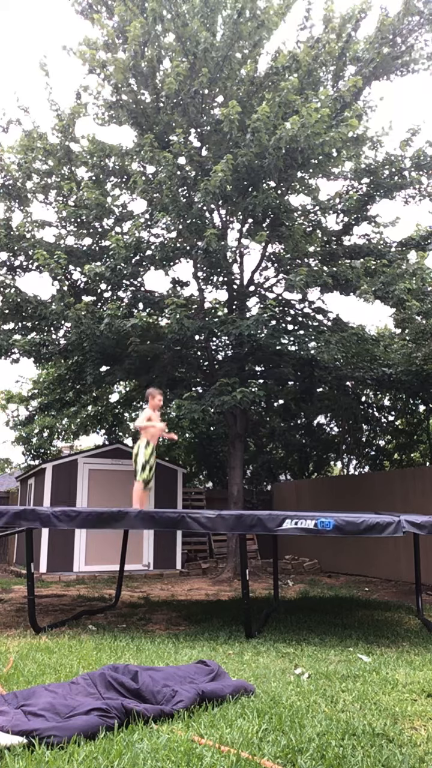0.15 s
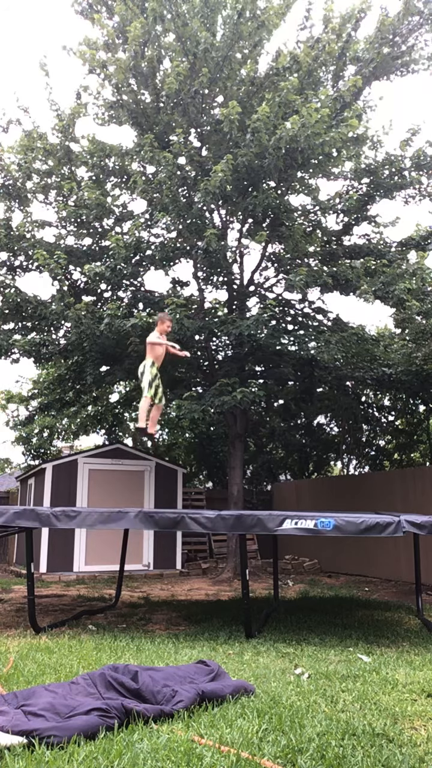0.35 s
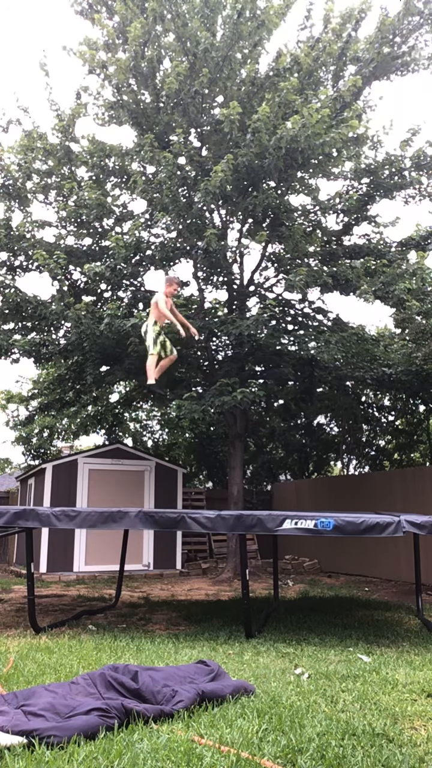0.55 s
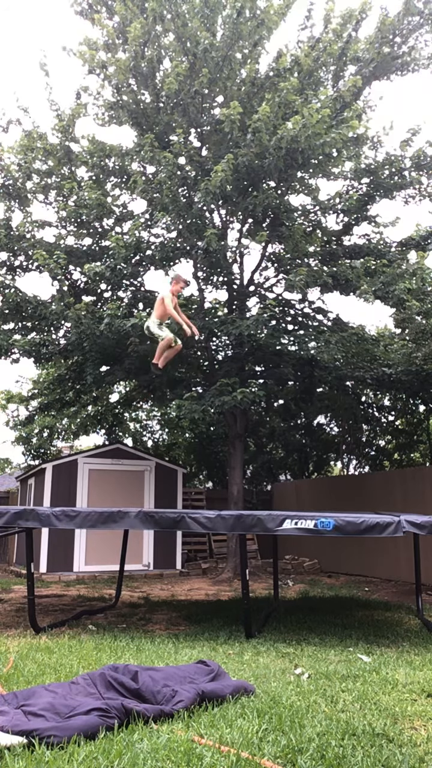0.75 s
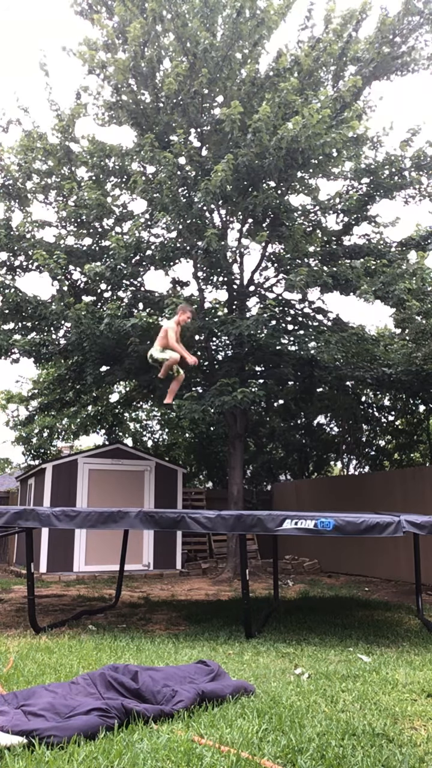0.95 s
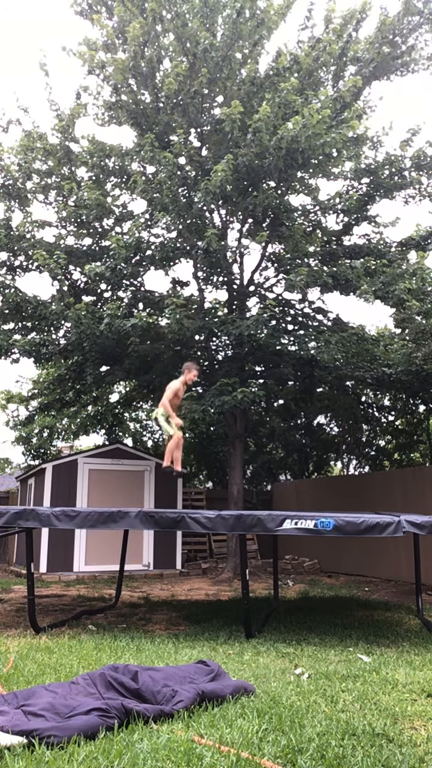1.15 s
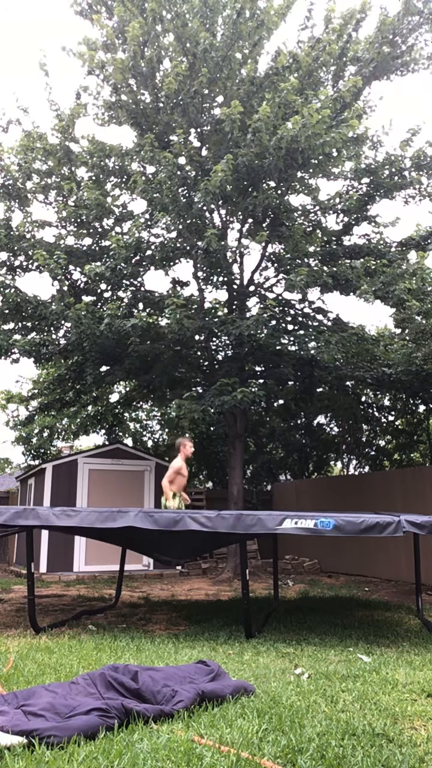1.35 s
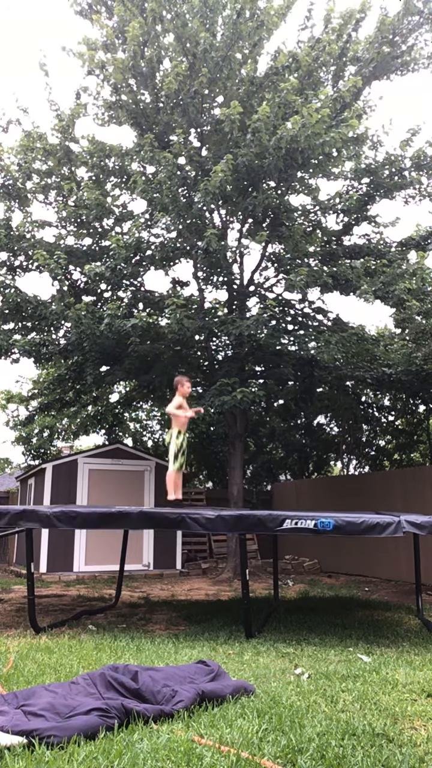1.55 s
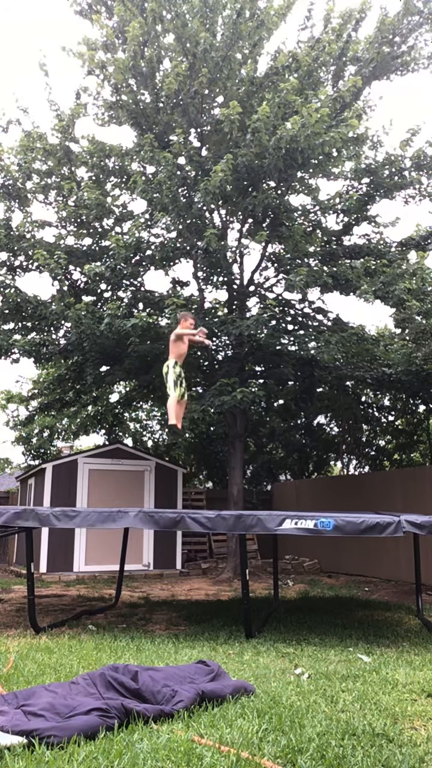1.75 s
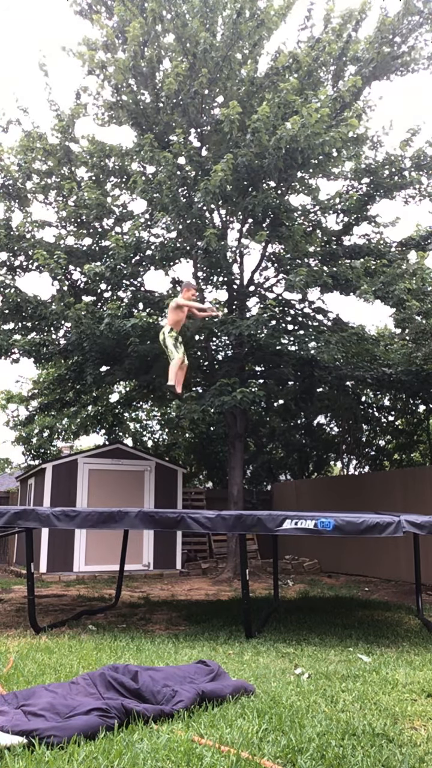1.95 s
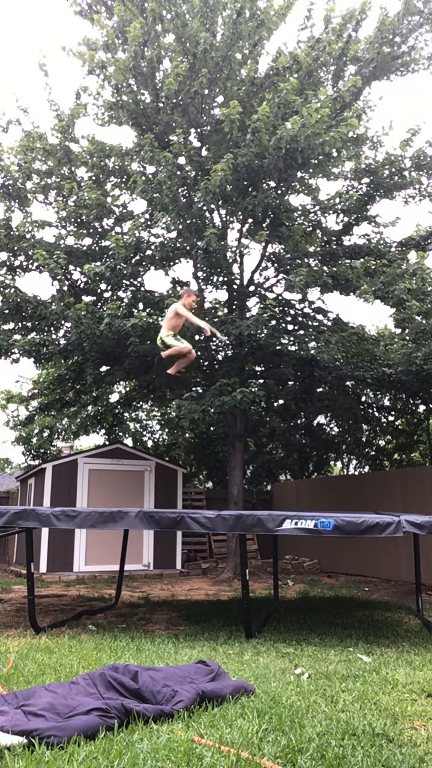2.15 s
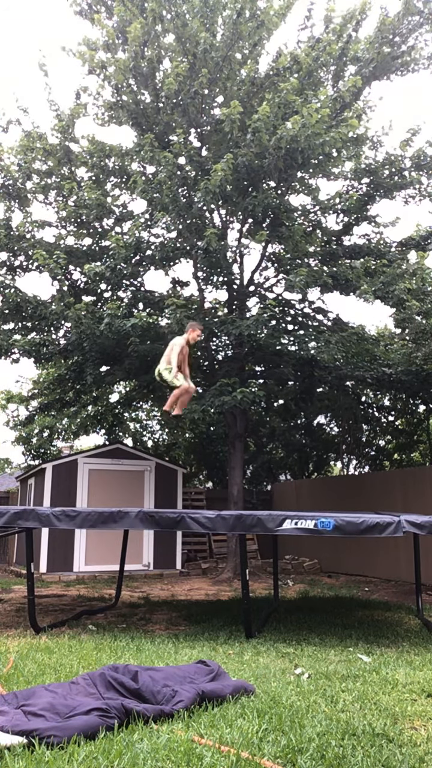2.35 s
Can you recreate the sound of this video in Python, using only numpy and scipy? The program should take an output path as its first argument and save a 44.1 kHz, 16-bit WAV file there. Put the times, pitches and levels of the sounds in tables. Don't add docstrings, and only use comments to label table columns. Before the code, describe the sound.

Hollow trampoline bounces thump and rattle the steel frame, with soft flapping and faint insects behind

```python
import sys
import numpy as np
from scipy import signal
from scipy.io import wavfile

SR = 44100
rng = np.random.default_rng(int(sys.argv[2]) if len(sys.argv) > 2 else 0)


def linear_from_db(decibels):
    return 10 ** (np.asarray(decibels, float) / 20)


def bounce(signal):
    frames = np.transpose(np.atleast_2d(signal))
    limited = np.clip(frames, -1, 1)
    pcm = np.round(limited * 32767).astype(np.int16)
    wavfile.write(sys.argv[1], SR, pcm)


N = 110250


def rms_one(x):
    return x / np.sqrt(np.mean(x ** 2) + 1e-20)


def white():
    return rng.standard_normal((2, N + SR // 10))


def drift(rate):
    hold = 40
    r = np.exp(-2 * np.pi * rate * hold / SR)
    noise = rng.standard_normal(N // hold + 2002)
    slow = signal.lfilter([1], [1, -2 * r, r * r], noise)[2000:]
    return np.interp(np.arange(N) / hold, np.arange(len(slow)), rms_one(slow))


def ring(x, hz, t60):
    r, w = linear_from_db(-60 / (t60 * SR)), 2 * np.pi * hz / SR
    return signal.lfilter([0, np.sin(w)], [1, -2 * r * np.cos(w), r * r], x + 1e-18)


def whistle(hz):
    return np.sqrt(2) * np.sin(2 * np.pi * np.cumsum(hz) / SR)


def swell(s, rise, fall):
    t = np.arange(N) / SR - s
    return np.exp(np.where(t < 0, t / max(rise, 1e-3), -t / max(fall, 1e-3)))


def bands(source, spectrum, patchy_db, rate):
    hz, db = np.transpose(spectrum)
    edges = 28 * 2 ** np.arange(0, 9.4, 1 / 3)
    edges = edges[(edges > hz[0] / 1.3) & (edges < hz[-1] * 1.3)]
    mids = np.sqrt(edges[1:] * edges[:-1])
    together = drift(rate / 4)
    rows = []
    for k, (low, high, mid) in enumerate(zip(edges, edges[1:], mids)):
        sos = signal.butter(2, [low, high], "band", fs=SR, output="sos")
        band = signal.sosfilt(sos, source[k % 2])[-N:]
        flicker_db = patchy_db * (0.5 * together + drift(rate))
        rows.append(linear_from_db(np.interp(np.log(mid), np.log(hz), db) + flicker_db) * band)
    rows = np.array(rows)
    return rows / np.sqrt(np.mean(rows.sum(axis=0) ** 2)), mids


def gusts(rows, octave, table):
    out = np.zeros(N)
    for s, db, rise, fall, tilt_db in table:
        out += linear_from_db(db) * swell(s, rise, fall) * (linear_from_db(tilt_db * octave) @ rows)
    return out


# f/Hz, density/dB per Hz
TRAFFIC_COLOUR = [(18, -49), (30, -10), (145, -4), (178, 3.5), (243, -10), (350, -5.5), (444, -18.5),
                  (1200, -10), (2400, -29), (3120, -76), (5280, -120)]
# f/Hz, density/dB per Hz
LEAF_COLOUR = [(1180, -32), (2000, -3.5), (2220, -6.5), (4710, -20.5), (7230, -25.5), (9510, -24),
               (11300, -26), (15500, -30)]
# f/Hz, width/Hz, rms level/dB
DRONE_HUMS = [(120, 8.6, -59), (172.7, 14, -67.5), (350.2, 13, -71), (776, 300, -60.5), (1189.6, 89, -67),
              (1374, 112, -65)]
TRAFFIC_DB, LEAVES_DB = -51, -67.5


def garden():
    traffic = bands(white(), TRAFFIC_COLOUR, patchy_db=0.6, rate=5.0)[0].sum(axis=0)
    leaves = bands(white(), LEAF_COLOUR, patchy_db=0.4, rate=12.0)[0].sum(axis=0)
    out = linear_from_db(TRAFFIC_DB) * traffic + linear_from_db(LEAVES_DB) * leaves
    for hz, width_hz, db in DRONE_HUMS:
        t60 = 2.3 / width_hz
        noise = rng.standard_normal(N + SR)
        hum = ring(ring(noise, hz, t60), hz, t60)[-N:]
        out += linear_from_db(db) * rms_one(hum)
    return out


# t/s, length/s, first f/Hz, last f/Hz, rms level/dB
CRICKET_NOTES = [(0.126, .012, 5620, 5460, -65), (.139, 0.016, 5640, 5900, -57),
                 (0.165, 0.036, 5660, 5610, -57.5), (0.2, .022, 5620, 5610, -57),
                 (0.244, .015, 5660, 5620, -71), (0.313, .008, 5620, 5660, -66),
                 (0.35, .012, 5620, 5560, -65), (.36, .015, 5640, 5640, -63),
                 (.965, 0.026, 5800, 5700, -85), (.998, 0.057, 5640, 5620, -78.5),
                 (1.057, 0.04, 5625, 5610, -83), (1.11, .035, 5600, 5600, -76),
                 (1.142, 0.064, 5600, 5610, -73), (1.212, 0.018, 5650, 5660, -71),
                 (1.24, .07, 5630, 5700, -78), (1.336, 0.02, 5700, 5715, -73.5),
                 (1.37, .035, 5720, 5710, -80), (1.405, .03, 5720, 5720, -81),
                 (1.436, 0.023, 5800, 5690, -85), (1.482, .012, 5600, 5600, -80),
                 (1.523, 0.022, 5760, 5800, -75)]


def cricket():
    t = np.arange(N) / SR
    waver_hz, throb = 10.0 * drift(33.0), linear_from_db(3.0 * drift(45.0))
    out = np.zeros(N)
    for s, length, first_hz, last_hz, db in CRICKET_NOTES:
        gate = np.clip(np.minimum(t - s, s + length - t) / 0.008 + 0.4, 0, 1)
        glide_hz = np.interp(t, [s, s + length], [first_hz, last_hz])
        out += linear_from_db(db) * gate * whistle(glide_hz + waver_hz)
    return throb * out


# t/s, length/s
KATYDID_CHIRPS = [
    [(.03, 0.018), (.695, 0.015), (.732, 0.0058), (.765, 0.0083), (.797, 0.0079), (.893, 0.0092),
     (1.066, 0.019), (1.097, 0.0089), (1.13, 0.0097), (1.167, 0.01), (1.197, 0.01), (1.238, 0.0083),
     (1.266, 0.013), (1.443, 0.011), (1.465, .01), (2.242, .008), (2.262, 0.01), (2.299, 0.01),
     (2.332, 0.0065), (2.404, 0.015), (2.432, 0.0082), (2.467, .009)],
    [(.998, 0.029), (1.368, 0.068), (2.163, 0.024)],
    [(.632, 0.0091), (.662, .022), (1.03, 0.016), (2.193, .05)],
    [(1.045, 0.032), (1.07, 0.04), (1.39, .035)],
    [(.108, .026)],
    [(.294, 0.021), (.336, .012)],
]
# f/Hz, rms level/dB
KATYDID_VOICES = [(9400, -78), (10250, -82), (12900, -84), (6850, -86), (13600, -80), (10800, -73)]
TICKS_PER_S, FIRST_TICK_S = 91.9, 0.0089
TICK_DB, TICK_SCATTER_DB = -85, 2.0


def katydids():
    t, out = np.arange(N) / SR, np.zeros(N)
    for chirps, (hz, db) in zip(KATYDID_CHIRPS, KATYDID_VOICES):
        gate = sum(np.clip(np.minimum(t - s, s + length - t) / 0.0029, 0, 1) for s, length in chirps)
        out += linear_from_db(db + 3.0 * drift(120.0)) * gate * whistle(hz + 110 * drift(150.0))
    at = (np.arange(FIRST_TICK_S, N / SR, 1 / TICKS_PER_S) * SR).astype(int)
    ticks = np.zeros(N)
    ticks[at] = linear_from_db(TICK_SCATTER_DB * rng.standard_normal(len(at)))
    ticks = signal.lfilter([1], [1, -0.93], ticks) * rng.choice([-1, 1], N)
    treble = signal.butter(2, [8500, 16000], "band", fs=SR, output="sos")
    return out + linear_from_db(TICK_DB) * rms_one(signal.sosfilt(treble, ticks))


# t/s, rms level/dB, rise/s, fall/s, brightness/dB per octave
AIR_RUSHES = [(.06, -69, 0.066, 0.021, -5.5), (0.108, -61, 0.001, 0.08, -0.5),
              (0.162, -53, 0.029, 0.089, -2.5), (.26, -62.5, 0.033, 0.1, -3.5),
              (0.227, -47, 0.001, 0.0074, -4), (0.244, -51.5, 0.0053, 0.0044, -4),
              (.30, -58, 0.11, 0.035, -9.5), (.315, -61, 0.0094, .03, 4), (.346, -56, 0.006, .01, 4),
              (0.367, -52, 0.011, 0.063, -7), (.47, -70, .01, 0.015, -10), (.56, -64.5, 0.12, 0.091, -3.5),
              (0.713, -68.5, 0.0034, 0.028, -6), (.745, -68, 0.022, 0.035, -7.5),
              (1.5, -65.5, 0.06, 0.06, -6), (1.56, -54.5, 0.027, 0.046, -6),
              (1.5605, -73, .001, 0.0041, -4), (1.597, -55, 0.019, 0.022, -2.5),
              (1.608, -50, .001, 0.0064, -7), (1.629, -56, 0.0066, 0.011, -6), (1.692, -55, 0.028, 0.05, 5),
              (1.73, -59, 0.033, 0.032, -7), (1.775, -56.5, 0.057, 0.057, -8.5),
              (1.841, -70.5, 0.0077, 0.024, -14), (1.9, -58, 0.034, 0.072, -4),
              (2.065, -67.5, 0.012, 0.027, -4)]
# f/Hz, density/dB per Hz
AIR_COLOUR = [(700, -14.5), (1800, -5), (3800, -3.5), (6000, -4.5), (10500, -9.5), (12500, -21),
              (14000, -36), (16000, -57)]
SPRING_PITCHES = [1994, 2877, 3396, 5610, 4170, 5090, 5440, 6620]
SPRING_DB, SPRING_T60_S = -17, 0.025
GRAINS_PER_S, GRAIN_SPREAD_DB = 3500, 4
GRAIN_SHARE = 0.28


def swish():
    sizes = linear_from_db(GRAIN_SPREAD_DB * np.minimum(rng.exponential(1, (2, N)), 5))
    signs = rng.choice([-1, 1], (2, N))
    grains = rms_one(sizes * signs * (rng.random((2, N)) < GRAINS_PER_S / SR))
    hiss = np.sqrt(GRAIN_SHARE) * grains + np.sqrt(1 - GRAIN_SHARE) * white()[:, :N]
    rows, mids = bands(hiss, AIR_COLOUR, patchy_db=1.2, rate=20.0)
    springs = []
    for hz in SPRING_PITCHES:
        tone = rms_one(ring(grains[0], hz, SPRING_T60_S))
        springs.append(linear_from_db(SPRING_DB + 3.0 * drift(10.0)) * tone)
    octave = np.log2(np.r_[mids, SPRING_PITCHES] / 4000)
    return gusts(np.r_[rows, springs], octave, AIR_RUSHES)


# t/s, rms level/dB, rise/s, fall/s, brightness/dB per octave
MAT_SHUDDERS = [(0.199, -39.5, 0.025, 0.049, 6), (0.228, -35.5, 0.022, 0.013, 3.5),
                (0.25, -28, 0.0051, 0.059, 0.5), (.33, -45, 0.058, 0.23, -1.5),
                (.49, -48.5, 0.039, 0.044, 6.5), (.53, -47, 0.038, 0.05, 5.5),
                (1.41, -41.5, 0.0065, 0.032, -3.5), (1.566, -46, 0.024, 0.06, 7),
                (1.588, -35.5, 0.016, 0.011, 2.5), (1.611, -29, 0.02, 0.044, 2.5),
                (1.70, -41, 0.015, 0.11, -1), (1.86, -44, 0.018, 0.014, 6), (1.89, -41, 0.023, 0.079, 2.5)]
# f/Hz, density/dB per Hz
SHUDDER_COLOUR = [(21, -51), (35, -15.5), (97, 9.5), (184, 6), (273, 6), (344, 1), (632, -12), (887, -13),
                  (2500, -40.5), (3250, -40), (5500, -120)]


def shudder():
    rows, mids = bands(white(), SHUDDER_COLOUR, patchy_db=3.5, rate=58.0)
    return gusts(rows, np.log2(mids / 250), MAT_SHUDDERS)


# t/s, peak level/dB, f/Hz, frame share/dB, swell/s
MAT_SNAPS = [(0.031, -38, 246, -8.5, 0.0039), (0.080, -41.5, 140, -1, 0.0071),
             (0.202, -31.5, 160, -17, 0.0096), (0.231, -7.5, 164, -3, 0.0053),
             (.244, -16.5, 243.4, -2, 0.0028), (.257, -19.5, 147, -2.5, 0.0034),
             (0.280, -26.5, 174, 0, 0.0045), (.292, -28, 202, 5.5, 0.0052), (0.316, -35, 143, -1, 0.0085),
             (0.462, -44, 165, 3, 0.0052), (0.489, -48, 174, 5, 0.0061),
             (0.5226, -27.5, 165.8, -5.5, 0.0083), (0.561, -39, 164, -8, 0.0076),
             (0.591, -37, 161, -11, 0.0058), (1.078, -45.5, 120, -19, 0.014),
             (1.405, -34.5, 155, -12, 0.0043), (1.421, -39, 120, -3, .009), (1.557, -50, 222, 0, 0.0028),
             (1.574, -39, 203, -2, 0.0045), (1.5884, -19, 161, -4.5, 0.0054),
             (1.6006, -17, 142, -2, 0.0041), (1.613, -23, 316, -10, 0.0037), (1.628, -23.5, 142, -4, 0.01),
             (1.651, -29.5, 109, -7, 0.0045), (1.864, -28.5, 167, -2, 0.0068),
             (1.905, -31, 157, -12, 0.0051), (1.925, -33, 167, -6.5, 0.0031),
             (1.946, -38, 168, -10, 0.0093), (1.974, -47, 135, -18, 0.006), (.189, -48, 783, -20, .006),
             (.2295, -34.5, 724, -12, 0.0091), (.246, -36, 767, -15, 0.0064),
             (0.521, -42.5, 770, -10, 0.0075), (1.552, -45, 650, -9, 0.0075),
             (1.563, -49, 900, -13, 0.0036), (1.597, -22, 311, -12, 0.0041),
             (1.862, -33.5, 291, -10, 0.0056), (1.885, -48, 774, -20, 0.0027)]
# f/Hz, level/dB, t60/s
FRAME_MODES = [(272, 7, 0.039), (328.6, -4, 0.063), (371.9, -1.5, 0.13), (467.2, -5.5, .1),
               (620, -23, 0.045), (685, -11, 0.04), (805, -11.5, 0.039), (873, -20.5, 0.076)]
FRAME_SCATTER_DB, CONTACT_HZ = 2.5, 1050
TAUT_SHARE, SLACKEN_S = 0.63, 0.0037


def snaps():
    out, t = np.zeros(N + SR), np.arange(SR // 5) / SR
    taut_t = t + TAUT_SHARE * SLACKEN_S * (1 - np.exp(-t / SLACKEN_S))
    for s, db, hz, _, swell_s in MAT_SNAPS:
        u = t / swell_s
        thump = (u * np.exp(1 - u)) ** 2 * np.sin(2 * np.pi * hz * taut_t)
        out[int(s * SR):][:len(t)] -= linear_from_db(db) * thump
    s, db, _, share_db, _ = np.transpose(MAT_SNAPS)
    soft = signal.butter(2, CONTACT_HZ, fs=SR)
    for k, (hz, level_db, t60) in enumerate(FRAME_MODES):
        scatter_db = FRAME_SCATTER_DB * rng.standard_normal(len(s))
        blows = np.zeros(N + SR)
        blows[(s * SR).astype(int)] = linear_from_db(db + share_db + level_db + scatter_db)
        push = ring(signal.lfilter(*soft, blows), hz, 0.016) * 300 / SR
        out += (-1) ** k * ring(push, hz, t60)
    return out[:N]


def scene():
    background = garden() + cricket() + katydids()
    trampoline = swish() + shudder() + snaps()
    return (background + trampoline)[None]


def roll_off(x):
    return signal.sosfilt(signal.butter(12, 15690, fs=SR, output="sos"), x)


def record(dry):
    bass_cut = signal.butter(6, 48, "high", fs=SR, output="sos")
    mix = signal.sosfilt(bass_cut, dry)
    return roll_off(mix)


dry = scene()
out = record(dry)
bounce(out)
```